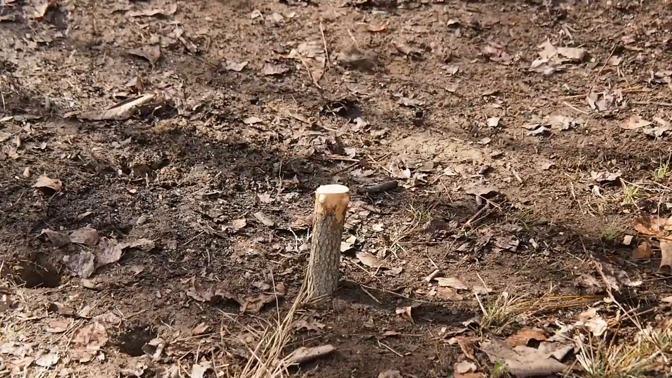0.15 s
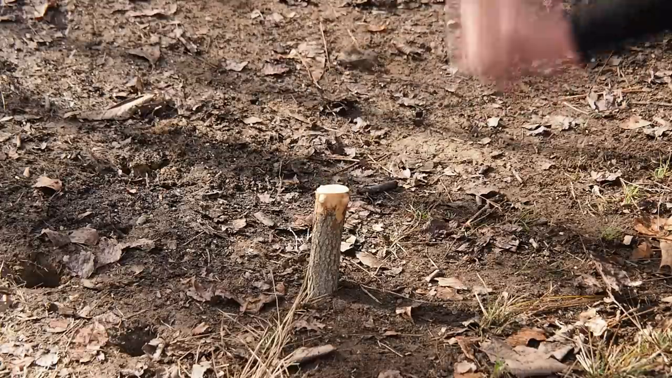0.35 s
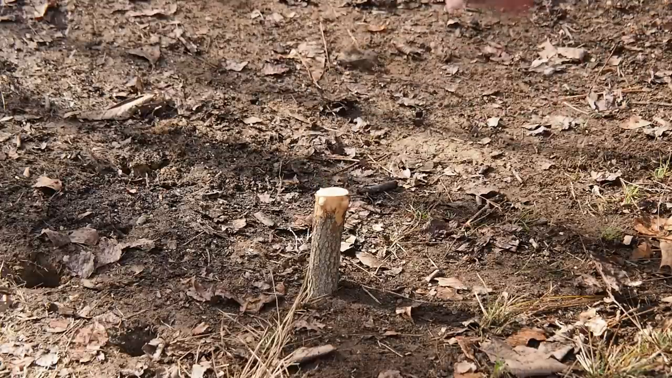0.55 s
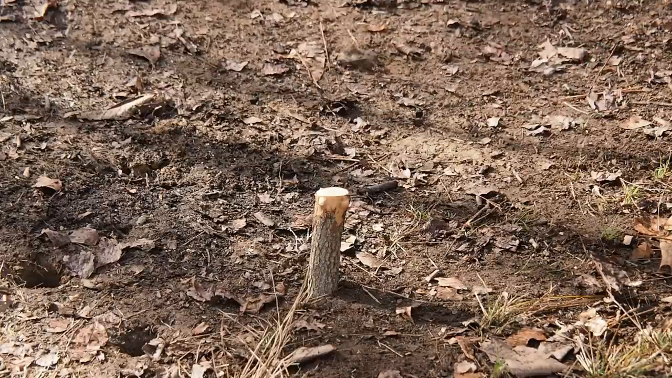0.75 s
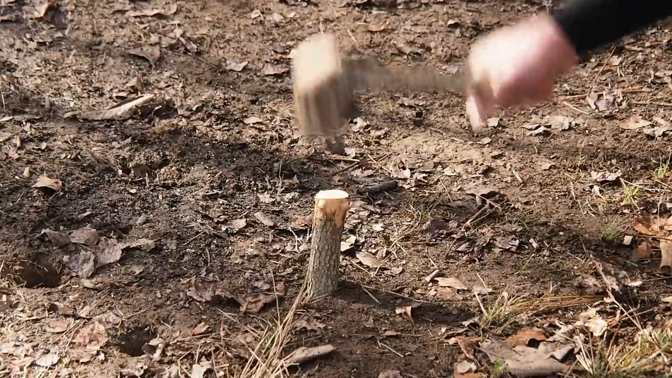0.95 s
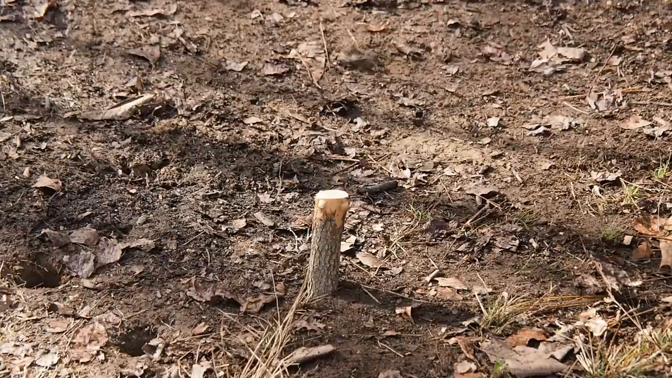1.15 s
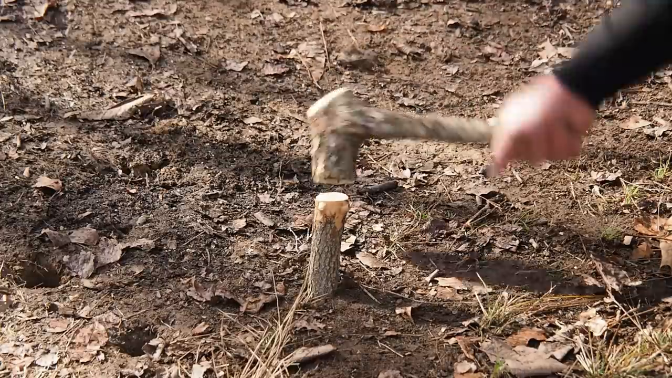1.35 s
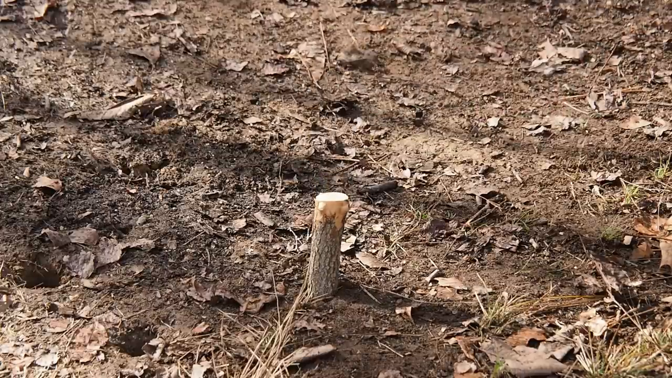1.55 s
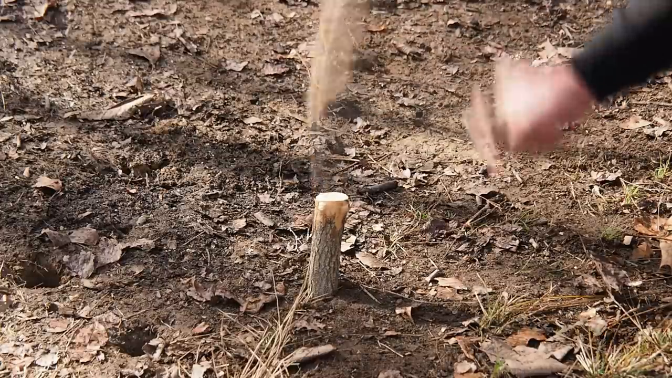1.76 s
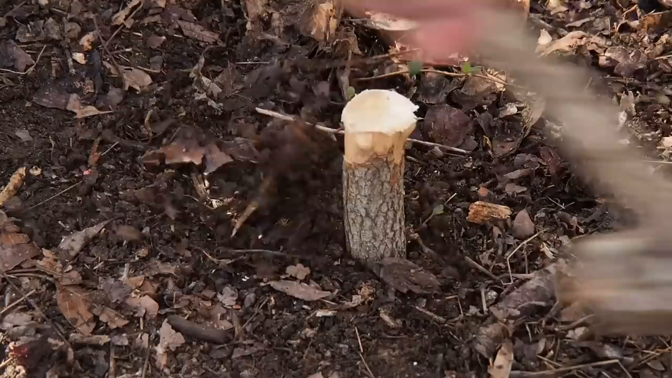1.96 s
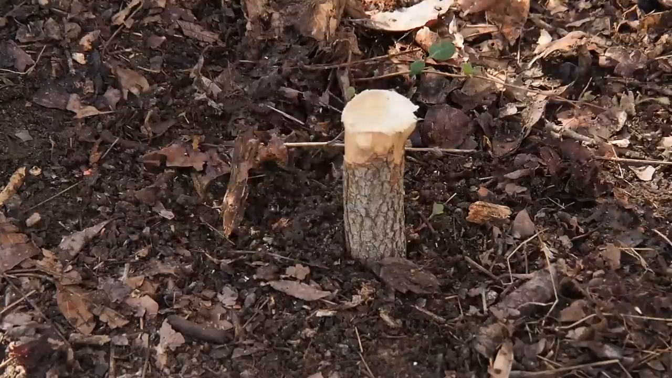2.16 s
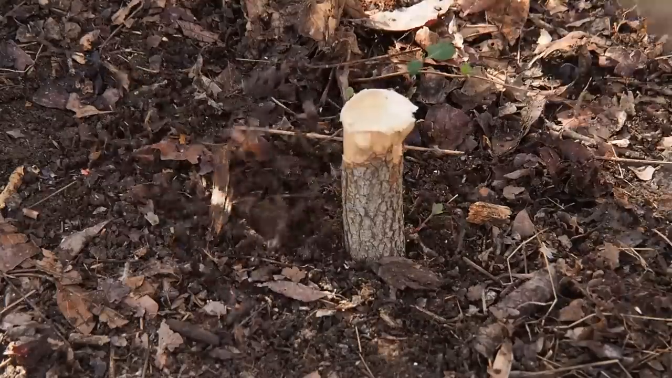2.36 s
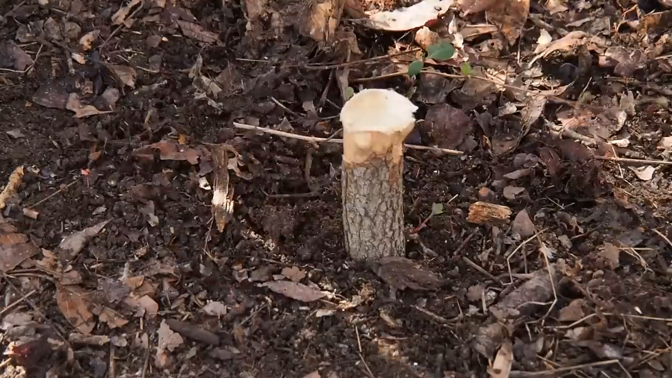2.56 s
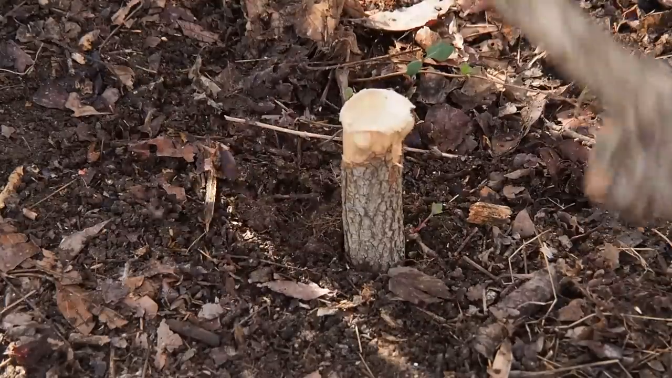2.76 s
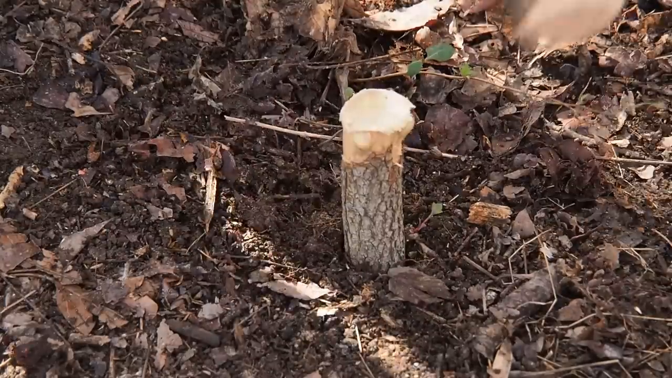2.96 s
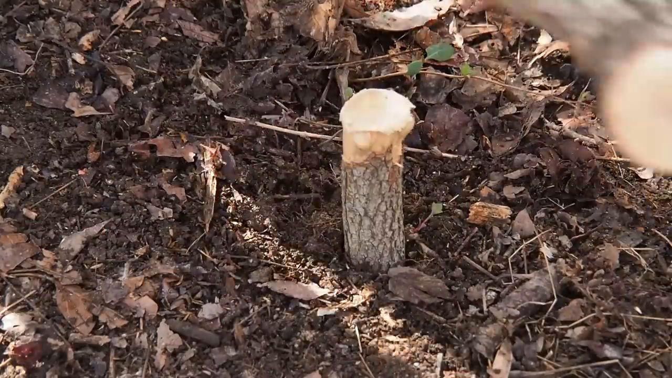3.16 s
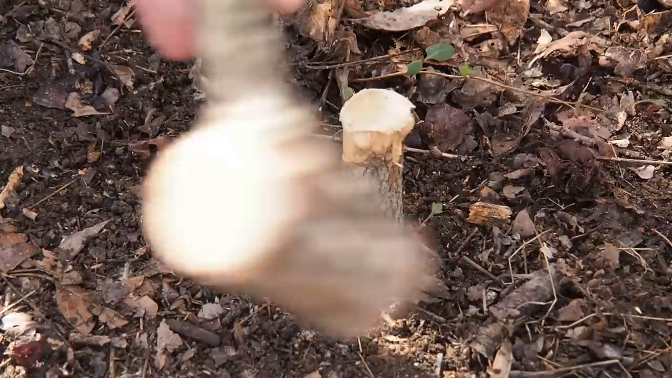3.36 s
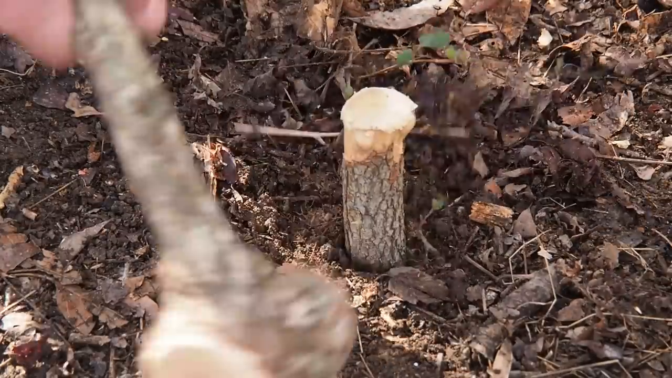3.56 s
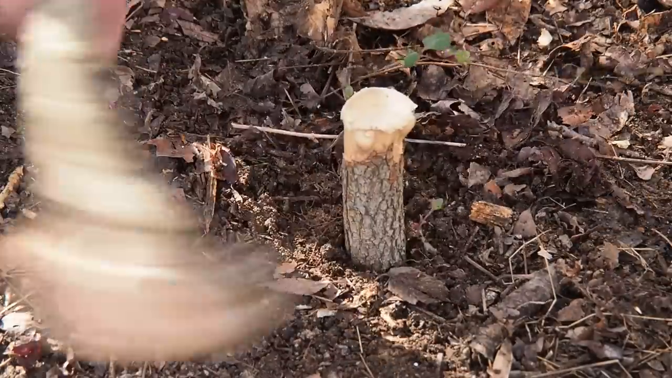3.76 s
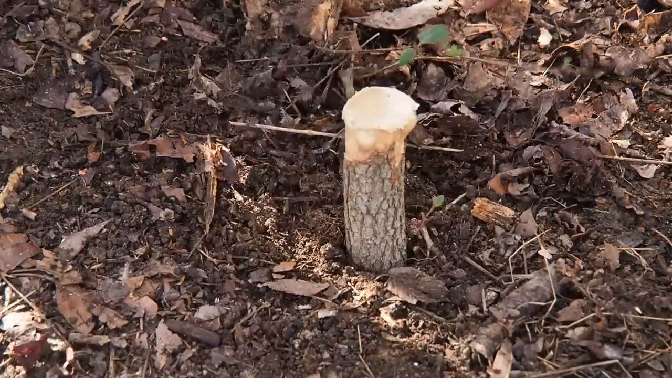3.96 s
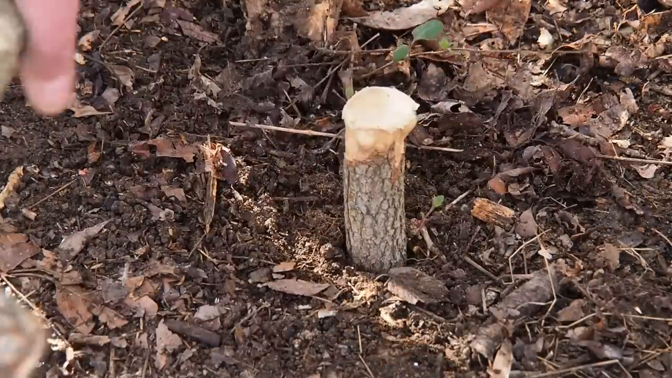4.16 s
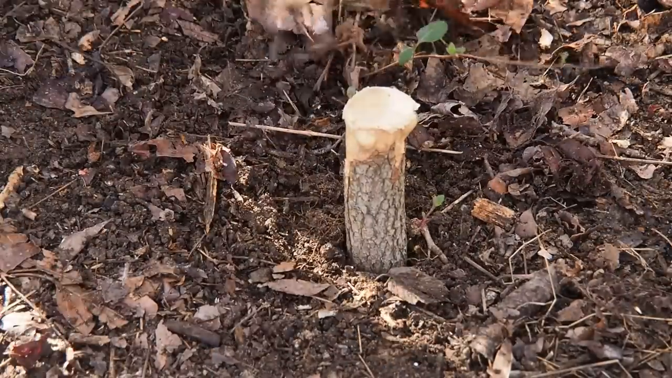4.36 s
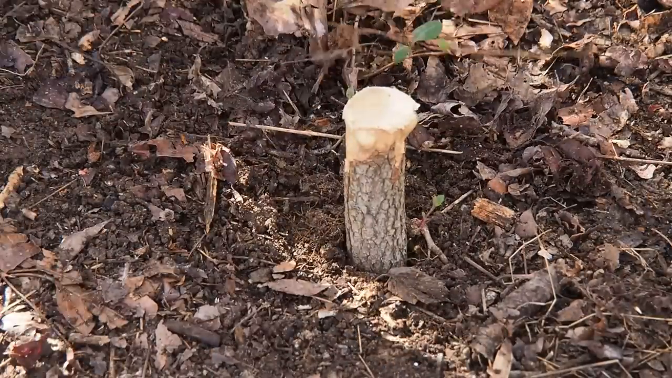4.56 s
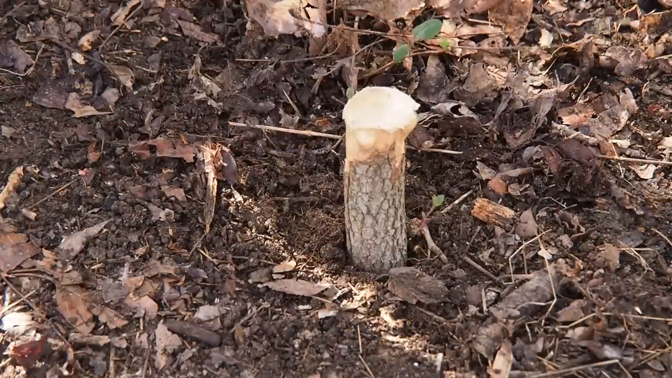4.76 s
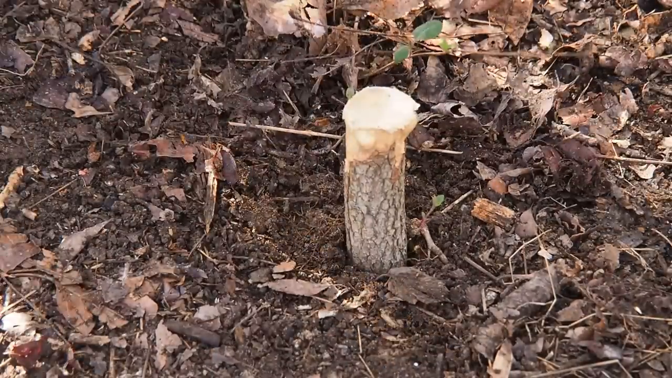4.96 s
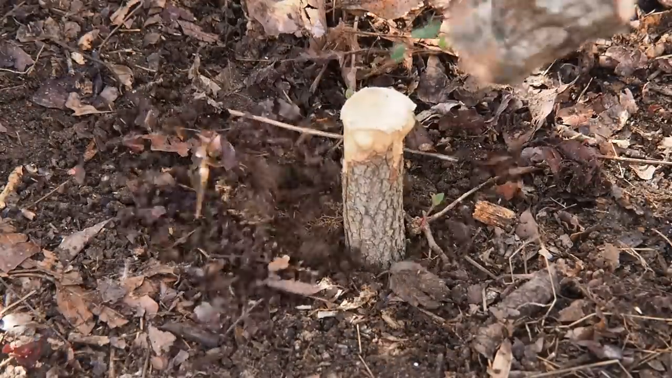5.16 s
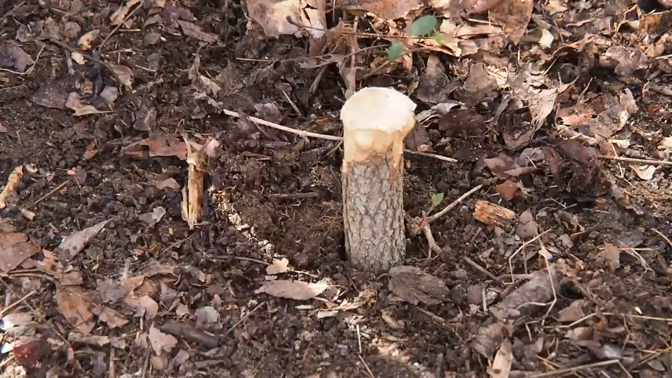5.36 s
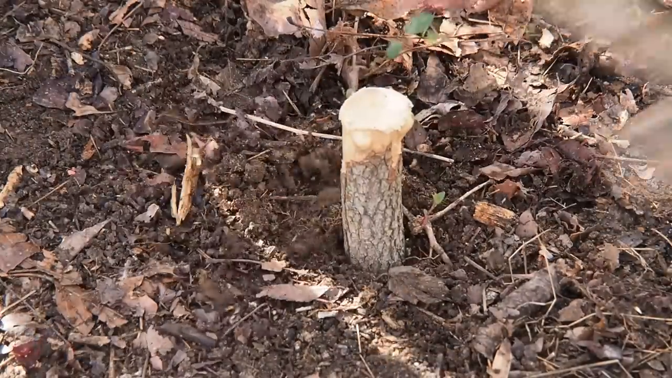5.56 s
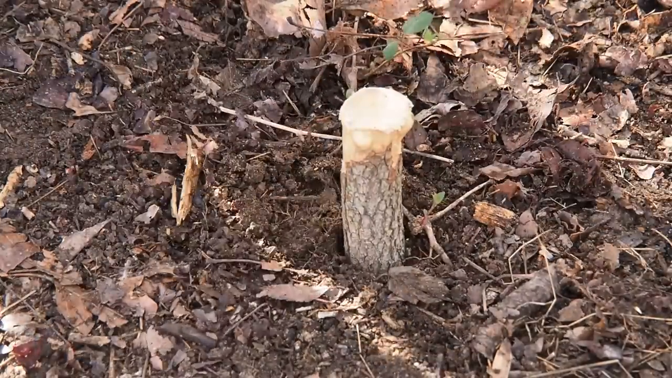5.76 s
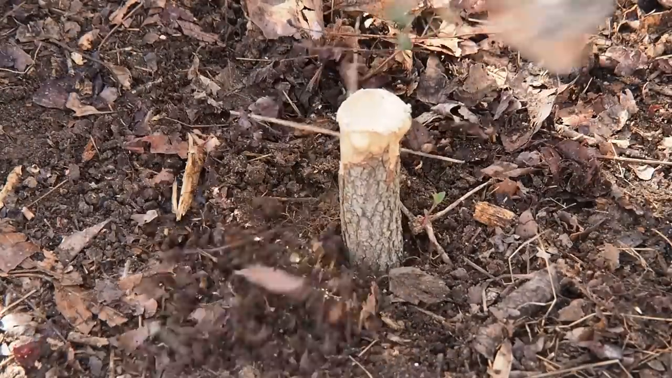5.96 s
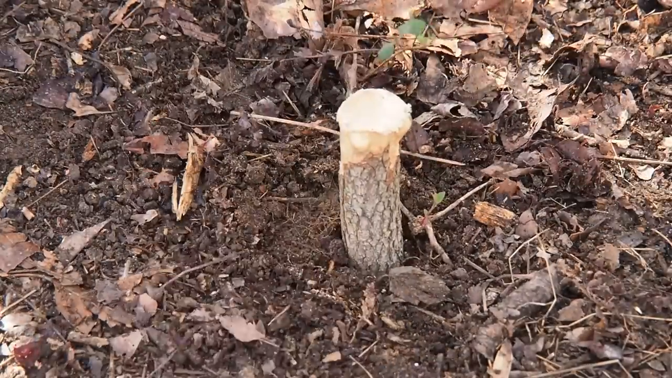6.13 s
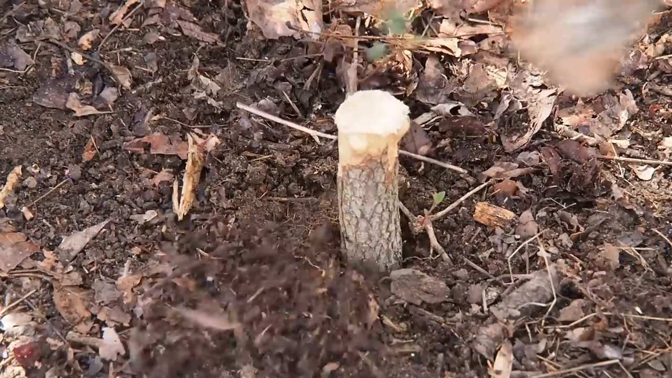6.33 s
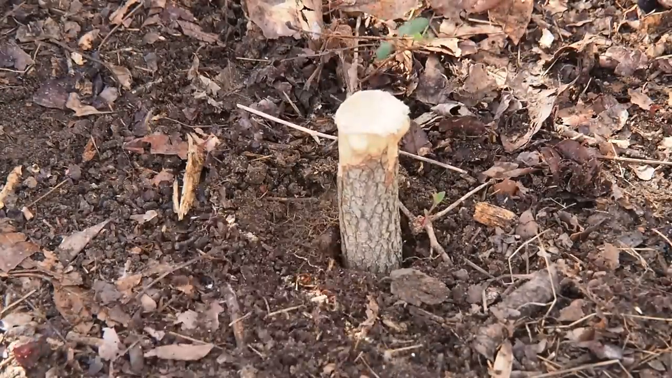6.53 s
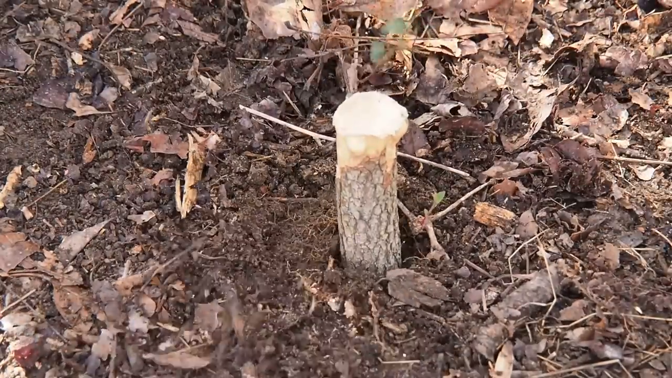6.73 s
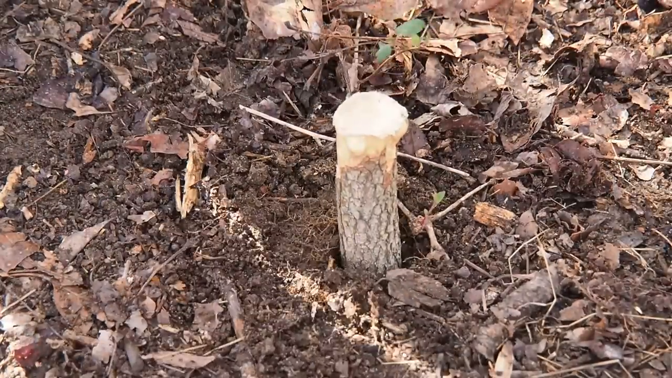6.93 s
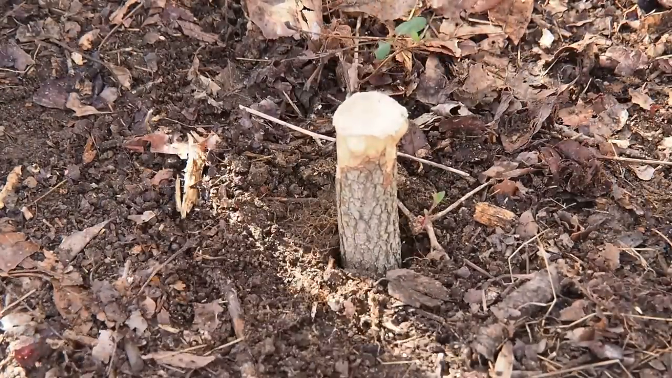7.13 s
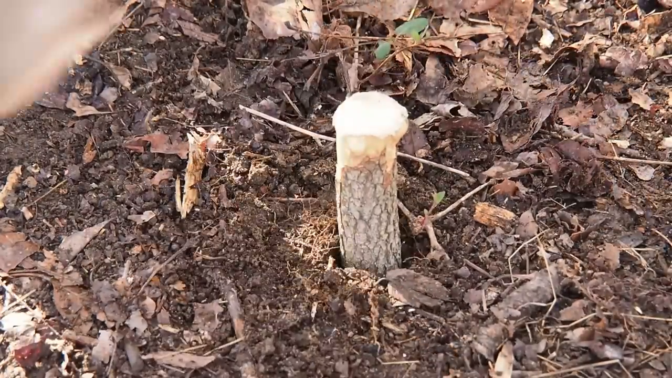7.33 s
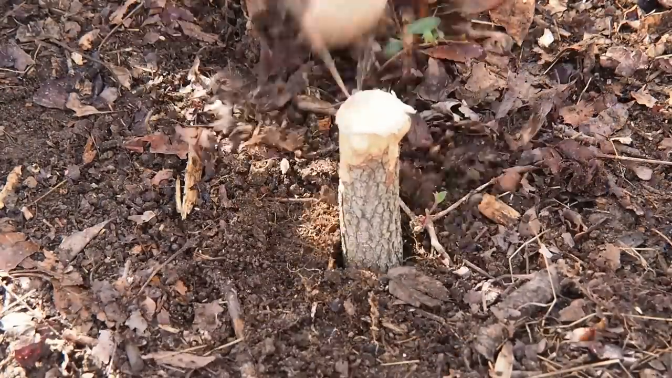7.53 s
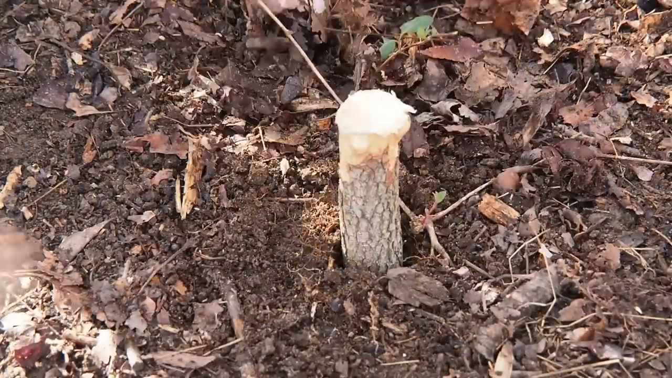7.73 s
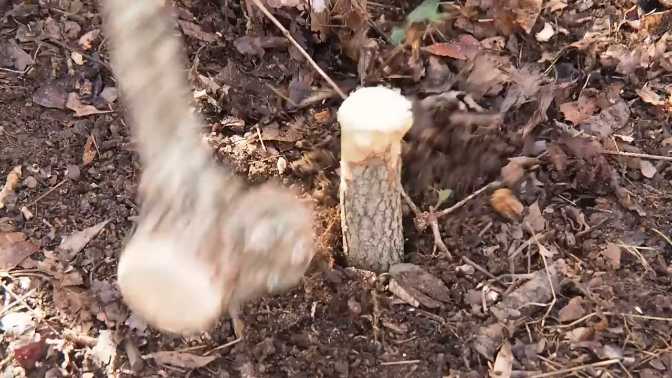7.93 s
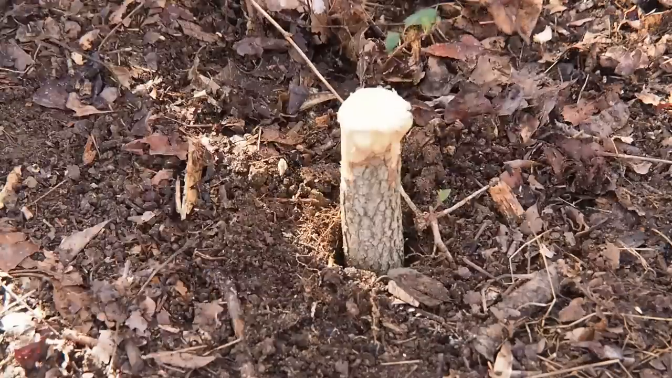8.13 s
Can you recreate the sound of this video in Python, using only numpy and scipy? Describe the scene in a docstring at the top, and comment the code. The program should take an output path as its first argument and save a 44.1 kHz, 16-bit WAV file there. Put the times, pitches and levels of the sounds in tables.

```python
"""A wooden mallet drives stakes into a forest floor, close by: a thin stake, then, after a cut, a thick one.
Each blow is a few cycles of damped wood modes and a thud as the stake slips in the soil.
The ground booms on low modes, earth ticks on dry leaves, and the trees return a faint echo of shaped noise.
Soft hiss and a low rumble lie beneath; blows are so loud that a gain control ducks and the peaks clip."""
import sys
import numpy as np
from scipy import signal
from scipy.fft import rfft, irfft, next_fast_len
from scipy.io import wavfile
from scipy.ndimage import uniform_filter1d

SR = 44100
rng = np.random.default_rng(int(sys.argv[2]) if len(sys.argv) > 2 else 0)


def log_audio(samples):
    """Write samples as a 16-bit WAV file to the path given in sys.argv[1]."""
    # one column per channel
    frames = np.atleast_2d(samples).T
    # limit to full scale, then quantise
    limited = np.clip(frames, -1, 1)
    pcm = np.round(limited * 32767).astype(np.int16)
    wavfile.write(sys.argv[1], SR, pcm)


N = 365588
T = np.arange(round(0.7 * SR)) / SR  # time within one sound [s]
CUT_S = 2.0  # thin stake before, thick stake after
CEILING_DB = 3  # gain control threshold, re full scale


def amp(db):
    """Decibels to gain."""
    return 10 ** (np.asarray(db) / 20)


def evened(x):
    """Scales to rms 1."""
    return x / np.sqrt(np.mean(x ** 2) + 1e-20)


def read(points, hz):
    """Interpolates a frequency table on a log-frequency axis."""
    f, value = np.transpose(points)
    return np.interp(np.log(hz + 1), np.log(f + 1), value)


def add(mix, start_s, sound):
    """Mixes a sound in at start_s, dropping what falls outside."""
    start = round(start_s * SR)
    sound = sound[max(-start, 0):]
    part = mix[max(start, 0):][:len(sound)]
    part += sound[:len(part)]


def noise(spectrum, size):
    """Gaussian noise of rms 1, shaped by a spectrum table."""
    padded = next_fast_len(size)
    hz = np.fft.rfftfreq(padded, 1 / SR)
    shaped = rfft(rng.standard_normal(padded)) * amp(read(spectrum, hz))
    return evened(irfft(shaped, padded)[:size])


def swell(tau_s, lag_s=0):
    """Rises to 1 within tau_s after the lag, then dies away on the same time constant."""
    u = np.maximum(T - lag_s, 0) / tau_s
    return u * np.exp(1 - u)


def ring(hz, tau_s):
    """A heavily damped mode under a soft contact."""
    return swell(tau_s) * np.sin(2 * np.pi * hz * T)


# background hiss: (frequency [Hz], relative density [dB per Hz])
HISS_SPECTRUM = [(88, -33), (150, -5.5), (383, -4.5), (578, -4), (730, -4), (1100, 0.5), (1260, -2),
                 (2310, -3), (4080, -4), (5790, -11), (15100, -12.5), (16000, -17)]
# background rumble: (frequency [Hz], relative density [dB per Hz])
RUMBLE_SPECTRUM = [(20, -7), (45, -4), (70, 1.5), (100, -4), (135, -11.5), (180, -15), (225, -11.5),
                   (300, -23), (550, -59)]
HISS_DB, RUMBLE_DB = -56, -61
TREMOR_DB, TREMOR_T60_S = -63.5, 1.7  # added rumble, re blow force


def air():
    """Steady hiss, and rumble whose power jumps at each blow on the thick stake and decays back."""
    t = np.arange(0, N, 64) / SR
    power = amp(RUMBLE_DB) ** 2
    for blow_s, force_db, *_ in THICK_BLOWS:
        tremor = amp(force_db + TREMOR_DB - 60 * abs(t - blow_s) / TREMOR_T60_S)
        power = power + (t > blow_s) * tremor ** 2
    rumble_level = np.interp(np.arange(N) / SR, t, np.sqrt(power))
    return amp(HISS_DB) * noise(HISS_SPECTRUM, N) + rumble_level * noise(RUMBLE_SPECTRUM, N)


def crumb(hz, tau_s):
    """A dry tick on a leaf or, drawn out, a grainy rustle: band noise with an uneven level."""
    grain = evened(amp(3 * evened(uniform_filter1d(rng.standard_normal(len(T)), size=90))))
    band = [(hz / 10, -40), (hz / 2, -8), (hz, 0), (hz * 2, -8), (hz * 10, -45)]
    return noise(band, len(T)) * swell(tau_s) * grain


# ticks and scrapes in the litter, and sleeve rustles as the mallet is raised before some blows: (time [s],
# level [dB], centre [Hz], swell and decay time [s])
TICKS_AND_RUSTLES = [(.92, -29.5, 588, 0.0055), (2.384, -44, 9000, 0.0013), (2.897, -50, 2098, 0.0098),
                     (3.395, -53, 1950, 0.0064), (4.269, -36.5, 3934, 0.0042), (4.29, -48, 7000, 0.016),
                     (4.3325, -34, 2190, 0.0034), (4.396, -50, 4000, 0.00099), (4.82, -58, 980, 0.045),
                     (4.925, -55, 550, 0.0043), (6.872, -40.5, 1887, 0.0029), (6.98, -48, 1190, 0.025),
                     (7.531, -52, 2985, 0.055)]
PATTER_DB = -64.5  # thrown earth, re blow force
FLIGHT_S, FLIGHT_SPREAD_S = 0.023, 0.13  # shortest time in the air, random extra


def litter():
    """Single ticks and rustles, and a patter of six crumbs thrown up by each blow on the thick stake."""
    out = np.zeros(N)
    for start_s, db, hz, tau_s in TICKS_AND_RUSTLES:
        add(out, start_s, amp(db) * crumb(hz, tau_s))
    for blow_s, force_db, *_ in THICK_BLOWS:
        for flight, size, pitch in rng.random(size=(6, 3)):
            grain_db = force_db + PATTER_DB - 12 * size - 6 * flight
            landing_s = blow_s + FLIGHT_S + FLIGHT_SPREAD_S * flight
            add(out, landing_s, amp(grain_db) * crumb(1200 * 4 ** pitch, 0.001))
    return out


# echo absorption, before the spreading loss: (frequency [Hz], t60 [s])
WOOD_T60 = [(100, 0.29), (500, 2.2), (1200, 8.7), (2500, 11), (5000, 0.64), (14000, 0.13)]


def trees(colour, tilt_db):
    """Ever weaker echoes from trunks farther off, in uneven clumps; bass and high treble die first."""
    clumps = amp(1.8 * evened(uniform_filter1d(rng.standard_normal(len(T)), size=130)))
    tilted = [(hz, db + tilt_db * np.log2(hz / 1000)) for hz, db in colour]
    taps = noise(tilted, len(T)) * clumps
    hz, t, bins = signal.stft(taps, SR, nperseg=256)
    absorbed = bins * amp(-60 * t / read(WOOD_T60, hz)[:, None])
    tail = signal.istft(absorbed, SR, nperseg=256)[1][:len(T)]
    onset = 1 - np.exp(-(T / 0.008) ** 2)
    spreading = (1 + T / 0.039) ** 1.606
    return tail * onset / spreading


def boom(ground):
    """Loose ground bounces on its low modes."""
    modes = sum(amp(db - 60 * T / t60_s) * np.sin(2 * np.pi * hz * T) for hz, db, t60_s in ground)
    return modes * (1 - np.exp(-T / 0.0044))


def crack():
    """Fibres crush at the contact, while bark grates on the soil slightly longer and weaker."""
    colour = [(100, -39.5), (1500, -13.5), (3500, 8.5), (5400, 3.5),
              (6800, -5.5), (8500, 1), (10500, -6), (16000, -9)]
    return amp(2) * noise(colour, len(T)) * (swell(0.00052) + amp(-20.5) * swell(0.0019))


def rasp():
    """The bruised end grain rasps for a few milliseconds under the mallet."""
    colour = [(100, -48.5), (1300, -21.5), (2400, 1), (4300, -2), (5400, -21.0), (16000, -48.5)]
    return noise(colour, len(T)) * swell(0.001, 0.00068)


NEAR_SCATTER_DB = -42.5
ECHO_TILT_SHARE = 0.25  # share of a blow's brightness that its echo keeps


def blow(row, modes, soil, wood, bounces, rasp_db, echo_db):
    """Wood knocks, pitched by where the mallet lands; then the stake gives, knocks again and thuds."""
    _, force_db, pitch, bright_db, crack_db, lag_s, give_db, thud_db = row
    knock = np.zeros(len(T))
    for k, (hz, db, tau_s) in enumerate(modes):
        mode_db = db + bright_db * np.log2(hz / 1000)
        knock += (-1) ** k * amp(mode_db) * ring(hz * pitch, tau_s)
    thud = sum(amp(db) * ring(hz, tau_s) for hz, db, tau_s in soil)
    direct = knock + amp(rasp_db + bright_db) * rasp()
    add(direct, lag_s, amp(give_db) * knock - amp(thud_db) * thud)
    direct = amp(CEILING_DB) * (direct / abs(direct).max() + amp(crack_db) * crack())
    # nearby litter scatters the knock
    scatter = amp(NEAR_SCATTER_DB) * rng.standard_normal(len(T)) * swell(0.0032, 0.0014)
    heard = direct + signal.fftconvolve(direct, scatter)[:len(T)]
    heard += amp(echo_db) * trees(wood, ECHO_TILT_SHARE * bright_db)
    for delay_s, db in bounces:
        add(heard, delay_s, amp(db) * direct)
    return amp(force_db) * heard


# blows and rebounds: (time [s], force as peak over the ceiling [dB], pitch factor, brightness [dB per octave],
# crack [dB], lag until the stake gives [s], second knock [dB], thud [dB])
THIN_BLOWS = [(0.42, 25.5, 1.013, -1, -38, 0.00046, -20, -26.5),
              (0.8739, 24.5, 1, -0.5, -40, 0.0015, -19, -26.5),
              (1.3425, 23, 1.065, -3.5, -39.5, 0.00068, -24, -26.5),
              (1.8, 23, 1.08, -2, -26, .0018, -29.5, -25.5)]
# stake modes: (frequency [Hz], level before brightness [dB], swell and decay time [s])
THIN_MODES = [(755, -4.5, .0007), (1381, -1.8, .00052), (2134, -6.5, .00064), (3040, -8, .00045),
              (3791, -18, .0006), (4900, -28, .0004)]
# soil packed round the stake: (frequency [Hz], relative level [dB], swell and decay time [s])
THIN_SOIL = [(330, 1, 0.00046), (139, -12, 0.0011), (231, -11.5, 0.0016)]
# tree echo colour: (frequency [Hz], relative density [dB per Hz])
THIN_WOOD = [(100, -13), (380, -17), (700, -3), (1250, 0), (2300, -3.5), (3200, -13), (4600, -11.5),
             (5800, -22), (10000, -26.5), (15000, -33)]
# reflections from ground and things nearby: (delay [s], level [dB])
THIN_BOUNCES = [(.0084, -24), (.0103, -24.5), (.0265, -37), (.037, -43.5)]
# loose ground modes: (frequency [Hz], relative level [dB], t60 [s])
THIN_GROUND = [(61, 1, 0.28), (131, 4.5, 0.24), (178, 6, 0.14)]
THIN_ECHO_DB, THIN_BOOM_DB = -41.5, -33  # echo re blow force; boom absolute


def thin_stake():
    """Hard, even blows up to the cut; one struck just before the start is still dying away."""
    out = np.zeros(N)
    for row in [(-0.034, *THIN_BLOWS[0][1:])] + THIN_BLOWS:
        knock = blow(row, THIN_MODES, THIN_SOIL, THIN_WOOD, THIN_BOUNCES,
                     rasp_db=-16, echo_db=THIN_ECHO_DB)
        add(out, row[0], knock + amp(THIN_BOOM_DB) * boom(THIN_GROUND))
    return out * (np.arange(N) < CUT_S * SR)


# blows and rebounds: (time [s], force as peak over the ceiling [dB], pitch factor, brightness [dB per octave],
# crack [dB], lag until the stake gives [s], second knock [dB], thud [dB])
THICK_BLOWS = [(2.2904, 8, .85, 3, -28, 0.0014, -16.5, 2.5), (2.2996, 6, 0.88, 19.5, -37, .0018, -19.5, 2),
               (2.647, 8.5, 1.23, -11, -31.5, .00037, -0.5, -5.5),
               (3.4758, 9, 0.98, -3, -23.5, 0.0012, -14, -11),
               (3.8221, 15, 0.96, -3.5, -42.5, 0.00094, 7, 0), (4.2693, 0.5, 0.99, 8, -32, 0.00096, 5.2, 8),
               (4.278, 0.5, .86, -6.5, -33.5, 0.00052, 5.5, 0),
               (5.147, 17, 1.19, -1, -33.5, .00111, -3, -3.5),
               (5.5062, 15.5, 1.093, -13, -40, .0011, -2.5, -4),
               (5.917, 11.5, 1.235, -4.5, -40.5, .00076, -8.5, -1),
               (6.287, 20.5, 1.2, -2, -33.5, .00075, 5.5, -5.5),
               (6.626, 21.5, 1.1, -7.5, -43, 0.00074, 6.5, -2),
               (7.496, 16.5, 1.005, -7, -34.5, 0.00056, 6.5, -2),
               (7.9299, 19.5, 0.76, 4.5, -33.5, 0.00063, -7.5, -9.5)]
# stake modes: (frequency [Hz], level before brightness [dB], swell and decay time [s])
THICK_MODES = [(1004.5, -2.1, 0.00035), (1730, -6, 0.00029), (2700, -15, 0.00093), (3410, -17, 0.00037),
               (4600, -32, 0.00059)]
# soil packed round the stake: (frequency [Hz], relative level [dB], swell and decay time [s])
THICK_SOIL = [(473, -2.35, 0.00058), (271, -19, 0.0021), (578, -19.5, 0.0021), (130.9, -32, 0.00064)]
# tree echo colour: (frequency [Hz], relative density [dB per Hz])
THICK_WOOD = [(100, -6), (350, -6.5), (700, -2.5), (1200, -0.5), (1900, -9), (3000, -16), (5000, -22.5),
              (9000, -34.5), (15000, -40.5)]
# reflections from ground and things nearby: (delay [s], level [dB])
THICK_BOUNCES = [(.0048, -21), (0.0149, -39.5), (.021, -41)]
# loose ground modes: (frequency [Hz], relative level [dB], t60 [s])
THICK_GROUND = [(56, -13, .7), (75, -7, .6), (98, 2, .5), (150, -6, .14)]
THICK_ECHO_DB = -45  # re blow force
# boom is full above this force, and weakens as the stake packs the ground firm
THICK_BOOM_DB, FULL_BOOM_FORCE_DB, FIRMING_DB_PER_S = -33, 9, 1.23


def thick_stake():
    """Duller blows on ground that grows firmer; ground and trees already ring as the run begins."""
    out = np.zeros(N)
    add(out, CUT_S, amp(-39.5) * boom(THICK_GROUND) + amp(-47.5) * trees(THICK_WOOD, tilt_db=-1))
    for row in THICK_BLOWS:
        blow_s, force_db = row[:2]
        firming_db = FIRMING_DB_PER_S * (blow_s - CUT_S)
        boom_db = THICK_BOOM_DB + min(force_db - FULL_BOOM_FORCE_DB, 0) - firming_db
        knock = blow(row, THICK_MODES, THICK_SOIL, THICK_WOOD, THICK_BOUNCES,
                     rasp_db=-28, echo_db=THICK_ECHO_DB)
        add(out, blow_s, knock + amp(boom_db) * boom(THICK_GROUND))
    return out


RECOVERY_DB_PER_S, LOOKAHEAD_S, ATTACK_S = 8.5, 0.0018, 0.0009


def gain_control(x, duck_db):
    """Peaks over the ceiling turn the gain down fast; it creeps back, so hiss swells between blows."""
    over_db = np.maximum(20 * np.log10(abs(x) + 1e-9) - CEILING_DB, 0)
    over_db[0] = duck_db
    fall_db = RECOVERY_DB_PER_S * np.arange(len(x)) / SR
    held_db = np.maximum.accumulate(over_db + fall_db) - fall_db
    ahead_db = np.pad(held_db, (0, round(LOOKAHEAD_S * SR)), "edge")[-len(x):]
    r = np.exp(-1 / (ATTACK_S * SR))
    smooth_db = duck_db + signal.lfilter([1 - r], [1, -r], ahead_db - duck_db)
    return x / amp(smooth_db)


def scene():
    """Both stakes, the leaf litter and the air."""
    return (thin_stake() + thick_stake() + litter() + air())[None]


START_DUCK_DB = 24.5  # already turned down by earlier blows
EDGE_HZ = 16100


def record(dry):
    """Gain control, afresh at the cut; soft clipping of peaks; gentle bass cut; band limit."""
    first, second = np.split(dry[0], [round(CUT_S * SR)])
    level = np.concatenate([gain_control(first, START_DUCK_DB), gain_control(second, 0)])[None]
    clipped = 0.96 * level / (1 + abs(level) ** 6) ** (1 / 6)
    bass_cut = signal.butter(1, 28, "highpass", fs=SR, output="sos")
    band_limit = signal.firwin(511, EDGE_HZ, window=("kaiser", 9), fs=SR)[None]
    return signal.oaconvolve(signal.sosfilt(bass_cut, clipped), band_limit, "same")


dry = scene()
out = record(dry)
log_audio(out)
```